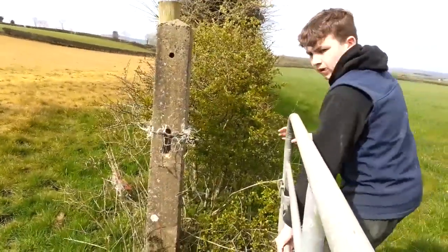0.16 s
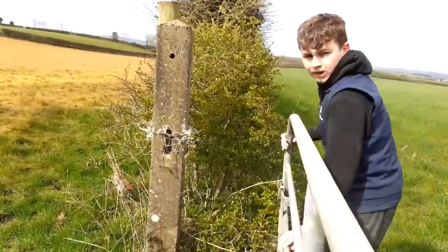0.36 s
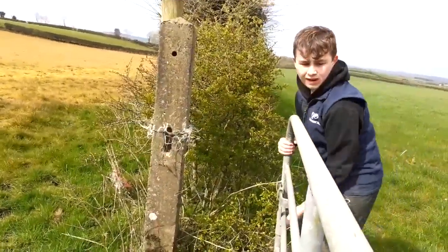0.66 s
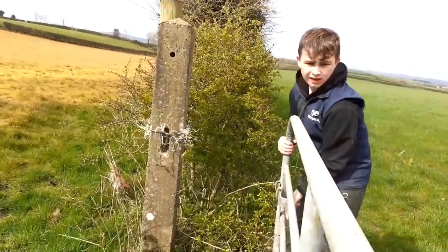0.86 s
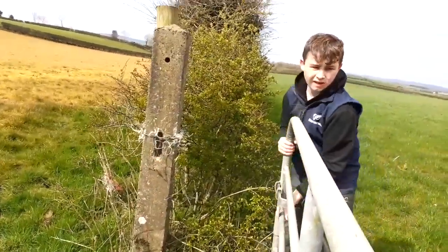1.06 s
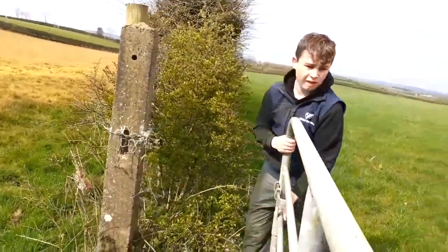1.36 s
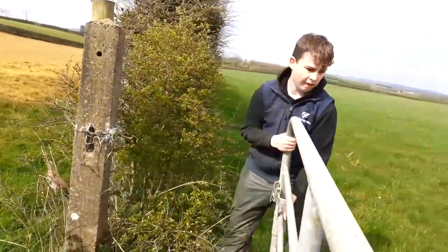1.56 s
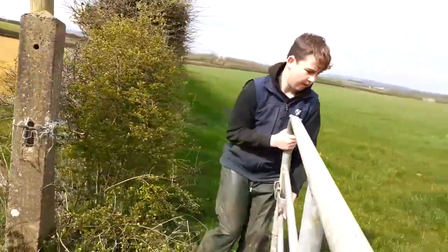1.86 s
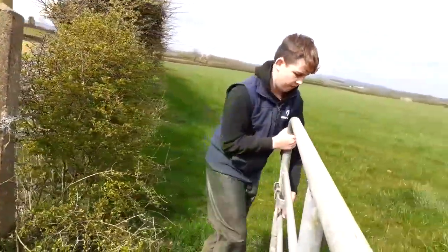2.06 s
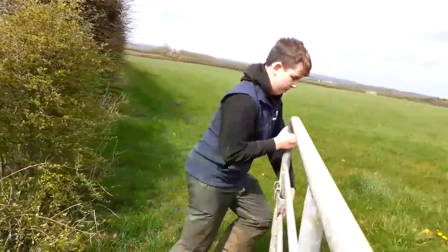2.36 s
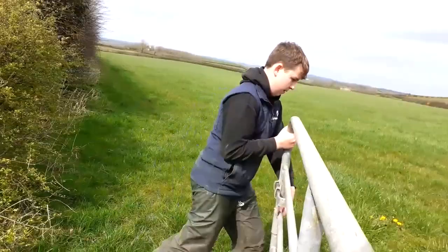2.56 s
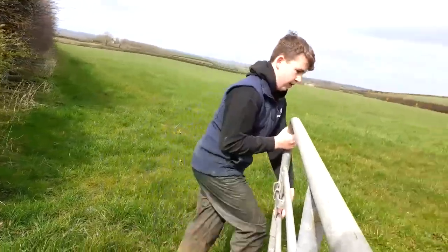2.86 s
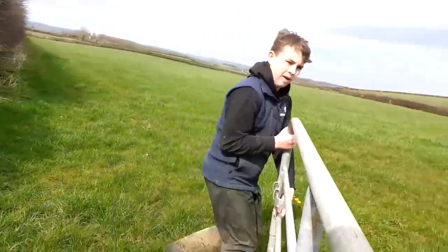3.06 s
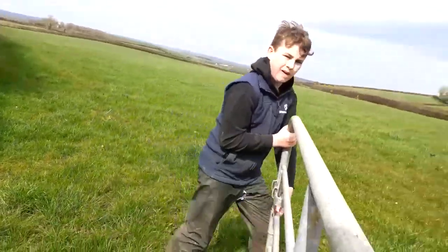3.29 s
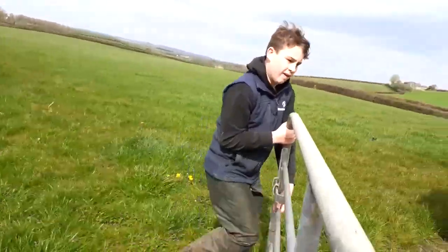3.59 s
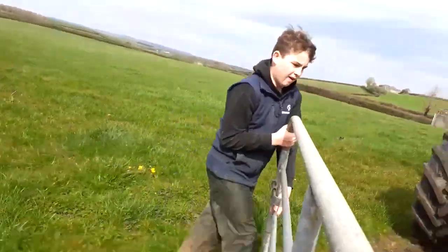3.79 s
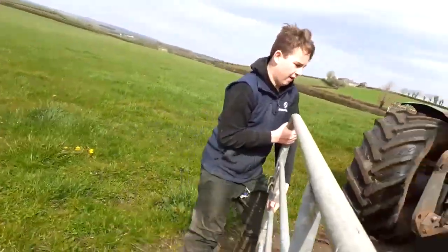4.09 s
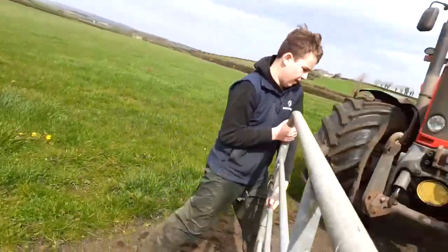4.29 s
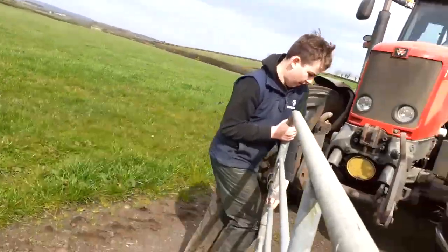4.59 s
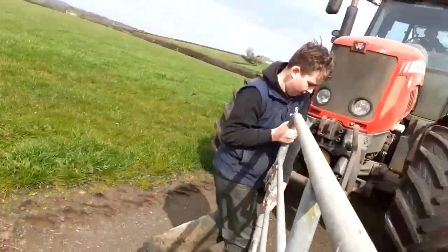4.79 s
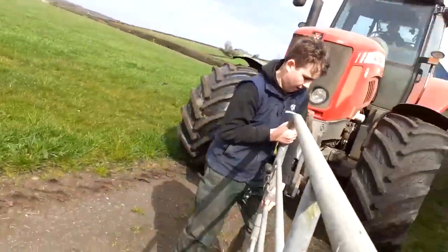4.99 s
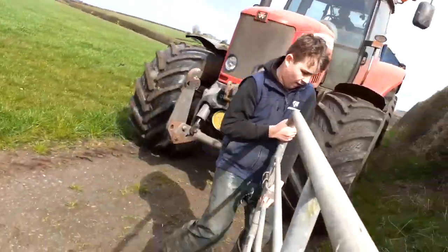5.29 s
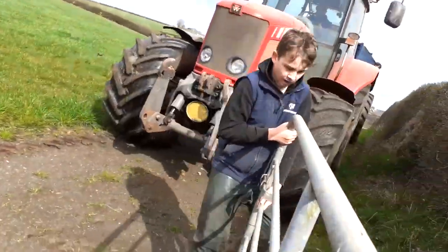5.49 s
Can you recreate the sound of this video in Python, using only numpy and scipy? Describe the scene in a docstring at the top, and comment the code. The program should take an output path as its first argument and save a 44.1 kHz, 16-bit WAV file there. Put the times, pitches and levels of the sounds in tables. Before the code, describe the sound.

Sharp ringing clanks of a steel gate over a steady clattering tractor idle, soon overwhelmed by thudding, rumbling wind buffets.

```python
"""A six-cylinder diesel tractor idles in an open field: hum, clatter and ticks, all timed by one crankshaft angle.
At once the chain and latch knock on a hollow tubular steel gate (decaying modes), which is then swung open.
Short metallic clinks and ticks, some of them single sharp engine knocks, are noise with a beating pair of tones.
The microphone rides round with the gate and turns towards the tractor; the lag between its ports follows.
Wind, as noise in random bursts, buffets first the right port, then both, in separate slaps over a rumble."""
import sys
import numpy as np
from scipy import signal
from scipy.fft import rfft, irfft, next_fast_len
from scipy.io import wavfile
from scipy.ndimage import map_coordinates

SR = 44100
rng = np.random.default_rng(int(sys.argv[2]) if len(sys.argv) > 2 else 0)


def put_to_file(sound):
    """Save the sound as 16-bit audio at rate SR, in the file named by the first command-line argument."""
    columns = np.atleast_2d(sound).T  # one column per channel
    safe = np.clip(columns, -1, 1)
    whole_steps = np.round(safe * 32767)
    wavfile.write(sys.argv[1], SR, whole_steps.astype(np.int16))


N = 249165
TIME = np.arange(N) / SR


def undb(db):
    """Amplitude ratio of a level: 20 dB for each factor of ten."""
    return 10 ** (np.asarray(db) / 20)


def unit(x):
    """Normalisation to an rms amplitude of 1."""
    return x / np.sqrt(np.mean(x ** 2))


def curves(table):
    """Linear interpolation in time of each column of a table."""
    s, *columns = np.transpose(table)
    return [np.interp(TIME, s, column) for column in columns]


def colour(x, points):
    """Minimum-phase filtering: the (f/Hz, level/dB) outline fixes the phase through a folded cepstrum."""
    hz, db = np.transpose(points)
    size = next_fast_len(x.shape[-1] + 4096) * 2
    f = np.maximum(np.fft.rfftfreq(size, 1 / SR), 1)
    outline_db = np.interp(np.log(f), np.log(hz), db)
    cepstrum = irfft(np.log(undb(outline_db)))
    # fold the anticausal half forwards
    cepstrum[1:size // 2] *= 2
    cepstrum[size // 2 + 1:] = 0
    response = np.exp(rfft(cepstrum))
    return irfft(rfft(x, size) * response)[..., :x.shape[-1]]


def walk(rate):
    """Band-limited random fluctuation: rms 1, changing about rate times a second."""
    grid = rng.standard_normal(8192)
    return unit(map_coordinates(grid, [TIME * rate], order=2, mode="wrap"))


def field_noise(alike_hz):
    """Spatial coherence: noise at two ports, alike in the bass and unrelated well above alike_hz."""
    likeness = 1 / (1 + np.fft.rfftfreq(2 * N, 1 / SR) / alike_hz)
    shared, *own = rfft(rng.standard_normal((3, 2 * N)))
    spectra = shared * np.sqrt(likeness) + np.array(own) * np.sqrt(1 - likeness)
    return irfft(spectra)[:, :N]


def sides(pan_db):
    """Interaural level difference: left and right gains, pan_db apart."""
    return undb(np.array([[pan_db], [-pan_db]]) / 2)


def windward(pan_db):
    """Sheltering: left and right gains, 1 at the port that takes the blow."""
    return sides(pan_db) / sides(pan_db).max()


def fade(t, t60):
    """Exponential decay of a free vibration, 60 dB in t60 seconds."""
    return np.exp(-np.log(1000) * t / t60)


def add(out, s, sound):
    """Linear superposition of a sound that starts at time s."""
    start = max(int(s * SR), 0)
    out[..., start:start + sound.shape[-1]] += sound[..., :N - start]


# Crankshaft speed: t/s, firing rate f/Hz
CRANK_SPEED = [(0, 42.44), (3.8, 42.44), (4.25, 41.8), (4.62, 39.2), (5.1, 40), (5.45, 41), (5.65, 41)]


def crank():
    """Phase as the integral of frequency: running count of firings."""
    return np.cumsum(curves(CRANK_SPEED)[0]) / SR - .07


# Knock of each cylinder in firing order: level/dB
CYLINDER_KNOCKS = [0, -2, 1, -38, -3.5, -17]


def knocks(firings, t60, steady, scatter_db):
    """Energy addition: decaying knocks, one a firing and each cylinder its own strength, over a steady rush."""
    count = np.floor(firings).astype(int)
    at = np.flatnonzero(np.diff(count)) + 1
    cylinder_db = np.array(CYLINDER_KNOCKS)[count[at] % len(CYLINDER_KNOCKS)]
    power = np.zeros(N)
    power[at] = undb(cylinder_db + scatter_db * rng.standard_normal(len(at))) ** 2
    t = TIME[:SR // 4]
    tail = (fade(t, t60) * (1 - np.exp(-t / 0.002))) ** 2
    return unit(np.sqrt(np.abs(signal.fftconvolve(power, tail)[:N]) + steady ** 2))


def engine_noise(firings, alike_hz, repeat):
    """Cyclostationary noise: a share of its power recurs with every two turns of the crankshaft."""
    cycle = firings / len(CYLINDER_KNOCKS) % 1
    place = (cycle * len(CYLINDER_KNOCKS) * SR / CRANK_SPEED[0][1]).astype(int)
    noise = field_noise(alike_hz)
    # the recurring share is read from the end of the noise, by crank angle
    recurring = noise[:, -1 - place]
    return np.sqrt(1 - repeat) * noise + np.sqrt(repeat) * recurring


# View of the tractor: t/s, lag of the left port/ms, how far the knocks stand out level/dB
BEARING_VIEW = [(0, 0.48, 0), (2, 0.47, -0.5), (3, 0.43, 2), (3.75, 0.29, 3), (4.25, 0.23, 3.5),
                (4.75, 0.11, 3.5), (5.3, -0.14, 5)]


def from_tractor(sound):
    """Interaural time difference: sound reaches the left port late or early, by the tractor's bearing."""
    lag_ms = curves(BEARING_VIEW)[0]
    left = np.interp(TIME - lag_ms / 1000, TIME, sound[0])
    return np.array([left, sound[1]])


# Reference level of the engine sound, dipping for a while after the strongest gusts: t/s, level/dB
ENGINE_LEVEL = [(0.0, -41.5), (0.35, -43), (2.17, -43), (2.45, -45), (2.51, -50), (2.72, -48), (2.81, -52),
                (3.0, -48.5), (3.2, -46.5), (3.55, -47.5), (3.85, -46), (4.47, -43), (5.24, -48),
                (5.65, -47)]
# Exhaust partials: multiple of the firing rate, mean level/dB within the hum
EXHAUST_PARTIALS = [(1, -14), (2, -1), (3, -5), (4, -19), (4.5, -15), (5, -15), (7, -11), (7.167, -4.5),
                    (7.333, -6), (7.5, -1), (7.667, -6), (8, -9), (8.5, -10)]
# Spectral outlines of the throbbing drone, block clatter and injector ticks: f/Hz, level/dB
DRONE_OUTLINE = [(25, -58), (50, -8.5), (75, -7), (110, 0.5), (170, -9.5), (245, -7), (285, 2), (314, -6),
                 (332, 3), (355, 0), (380, -5.5), (440, -1.5), (560, -6.5), (690, -5.5), (950, -18),
                 (2000, -55.5)]
BLOCK_OUTLINE = [(400, -6.5), (850, 1.5), (1100, 1), (1400, -1), (1650, 0.5), (2050, -0.5), (2400, -4.5),
                 (2750, -3), (3200, -10.5), (4500, -14.5), (8000, -29.5)]
INJECTOR_OUTLINE = [(1500, -52), (3000, 7.5), (4000, 5.5), (5000, 6), (6400, 4), (7800, 4.5), (8600, -5),
                    (9600, -37), (11500, -7), (16000, -7)]
# Parts relative to the reference level, dB; LOW_DB is for hum, fan and drone together, before shading
LOW_DB, BLOCK_DB, INJECTOR_DB = 18.5, 9.5, 1
BONNET_SHADE = 1  # the bonnet hides the exhaust: dB of low sound lost per dB that the knocks stand out


def tractor():
    """Harmonics and modulated noise: exhaust hum, fan tone, drone, clatter and ticks locked to the crank."""
    (engine_db,), (_, clear_db) = map(curves, (ENGINE_LEVEL, BEARING_VIEW))
    firings = crank()
    hum = 0
    for multiple, db in EXHAUST_PARTIALS:
        swell = undb(db + 2.6 * walk(9))
        hum = hum + swell * np.sin(2 * np.pi * (multiple * firings + rng.random()))
    fan = np.sin(2 * np.pi * 3.555 * firings)
    # seen head-on, the knocks stand further out of the steady rush
    rush = undb(-clear_db)
    drone = engine_noise(firings, alike_hz=8040, repeat=0.13)
    drone = drone * knocks(firings, t60=0.034, steady=0.55, scatter_db=5.5)
    block = engine_noise(firings, alike_hz=2900, repeat=.3)
    block = block * knocks(firings, t60=.09, steady=.6 * rush, scatter_db=1.2)
    injectors = engine_noise(firings, alike_hz=3000, repeat=.3)
    injectors = injectors * knocks(firings, t60=.06, steady=.36 * rush, scatter_db=1.5)
    low = undb(-2.5) * unit(hum) + undb(-17) * fan + undb(-2.3) * unit(colour(drone, DRONE_OUTLINE))
    engine = (low * undb(LOW_DB - BONNET_SHADE * clear_db)
              + unit(colour(block, BLOCK_OUTLINE)) * undb(BLOCK_DB)
              + unit(colour(injectors, INJECTOR_OUTLINE)) * undb(INJECTOR_DB))
    return from_tractor(undb(engine_db) * engine) * sides(pan_db=-1.5)


# Course of the high hiss before its swell: t/s, level/dB
HISS_LEVEL = [(0, -53), (1.5, -58), (2.15, -47.5), (2.45, -53.5), (2.6, -53), (2.92, -57.5), (3.6, -58),
              (4.35, -54), (5.25, -57), (5.65, -64)]
# Spectral outline of the hiss: f/Hz, level/dB
HISS_OUTLINE = [(2000, -35), (5000, 4), (7800, 7), (9600, -3.5), (11500, 4), (16000, 0)]
THROB_DB, THROB_AT = 3, 0.25  # swell either way; its place in the engine cycle (0-1)


def hiss():
    """Amplitude modulation: faint engine noise swells once a cycle, incoherent between the ports."""
    throb_db = THROB_DB * np.cos(2 * np.pi * (crank() / len(CYLINDER_KNOCKS) - THROB_AT))
    noise = unit(colour(rng.standard_normal((2, N)), HISS_OUTLINE))
    return noise * undb(curves(HISS_LEVEL)[0] + throb_db + 0.81 * walk(22.6))


# Steady breeze, growing as the gate swings into the open: t/s, level/dB midway between the ports
BREEZE_LEVEL = [(0, -47), (3, -32.5), (3.75, -29), (4.3, -22.5), (5.65, -19.5)]
# Gusts: start t/s, hold/s, level/dB at the stronger port, left minus right level/dB,
# rumble over flutter level/dB
GUST_EVENTS = [(0.602, 0.0099, -21, 7, -18), (1.932, 0.4, -27, -5.5, 3.5), (2.275, 0.092, -32.5, -15, 14),
               (2.45, 0.095, -25, -14, 8), (2.56, 0.034, -25.5, 1, 6), (2.592, 0.13, -22.5, -18, 7),
               (2.714, 0.089, -20, -20, 6), (4, 0.3, -28, 18, 4.5), (4.364, 0.12, -24, 3, 2),
               (4.512, 0.12, -22, 0.5, 2), (4.896, 0.066, -18, 2, 1), (4.996, 0.097, -18, -3, 0),
               (5.182, 0.084, -17.5, -0.5, -3), (5.349, 0.092, -18.5, 4, 3.5), (5.58, 0.08, -17.5, 3, -19)]
BREEZE_PAN_DB, BREEZE_RUMBLE_DB = 2.5, -5.5  # left minus right; rumble over flutter
GUST_ATTACK_S, GUST_RELEASE_S = .012, .026


def airflow():
    """Power addition of breeze and gusts that rise, hold and drop: flutter and rumble gains at each port."""
    flutter = (undb(curves(BREEZE_LEVEL)[0]) * sides(BREEZE_PAN_DB)) ** 2
    rumble = flutter * undb(BREEZE_RUMBLE_DB) ** 2
    for s, hold_s, db, pan_db, rumble_db in GUST_EVENTS:
        corners = [-GUST_ATTACK_S, 0, hold_s, hold_s + GUST_RELEASE_S]
        shape = np.interp(TIME - s, corners, [0, 1, 1, 0])
        power = (shape * undb(db) * windward(pan_db)) ** 2
        flutter = flutter + power
        rumble = rumble + power * undb(rumble_db) ** 2
    return np.sqrt(flutter), np.sqrt(rumble)


# Spectral outlines of flutter, rumble and rasp: f/Hz, level/dB
FLUTTER_OUTLINE = [(20, -17), (80, -26.5), (170, -2.5), (270, -3.5), (330, 5.5), (390, -2), (600, -9),
                   (900, -25), (1400, -44), (2000, -32), (3500, -44.5), (9000, -79)]
RUMBLE_OUTLINE = [(20, -32), (45, -9.5), (80, 0), (120, 4), (180, -9), (300, -2.5), (800, -69.5)]
RASP_OUTLINE = [(300, -10.5), (600, 22.5), (1000, 7), (1450, -18), (2000, 2), (2600, -36), (8000, -14),
                (12000, -70)]


def wind(flutters, rumbles):
    """Intermittent turbulence at each port: large eddies rumble, small ones flutter and rasp in bursts."""
    ports = []
    for flutter_gain, rumble_gain in zip(flutters, rumbles):
        burst_db = 4.2 * walk(120) + 1.5 * walk(40)
        flutter = unit(colour(rng.standard_normal(N) * undb(burst_db), FLUTTER_OUTLINE))
        rumble = unit(colour(rng.standard_normal(N) * undb(burst_db), RUMBLE_OUTLINE))
        # the rasp bursts more sharply
        rasp = unit(colour(rng.standard_normal(N) * undb(1.5 * burst_db), RASP_OUTLINE))
        small = undb(-1.0) * flutter + undb(-19.5) * rasp
        ports.append(flutter_gain * small + rumble_gain * rumble)
    return np.array(ports)


POP_REACH_S = .03  # computed to this far either side of its centre


def pop(hz, cycles):
    """Pressure pulse of one eddy: a sine under a sech envelope, above half height for the given cycles."""
    t = TIME[:2 * int(POP_REACH_S * SR)] - POP_REACH_S
    return np.sin(2 * np.pi * hz * t) / np.cosh(2 * np.arccosh(2) * t * hz / cycles)


# Hardest eddies: centre t/s, level/dB at the stronger port, mean pitch f/Hz, left minus right level/dB,
# width/cycles, crack over slap level/dB
SLAPS = [(2.292, -3.5, 224, -6, 0.83, -23), (2.331, -8, 142, -13, 0.61, -28),
         (2.34, -4.5, 127, -22, 1.5, -28), (2.462, 1, 310, -23, 0.77, -21),
         (2.4838, -1, 295, -21, 0.87, -30), (2.4959, 0, 282, -25, 0.8, -36),
         (2.5328, 0.5, 300, -24, 1, -24), (2.5676, -2, 264, 16, 0.76, -25), (2.607, -6, 210, -11, .7, -26),
         (2.619, 2.5, 306, -20, 0.95, -22), (2.636, 0.5, 487, -20, 0.72, -19),
         (2.6411, 1.5, 295, -17, 2, -23), (2.6696, 0.5, 327, -19, .9, -9.5),
         (2.7247, -2.5, 211, -27, 1.4, -30), (2.7414, 0.5, 300, -29, 1.3, -25),
         (2.756, -3.5, 407, -23, 1.04, -18), (2.7772, 0, 248, -23, 0.62, -35),
         (2.7874, 0, 180, -19, 0.57, -38), (2.7981, -7, 210, -21, 0.52, -37),
         (2.8162, -6, 256, -9, 0.64, -34), (3.981, -7.5, 333, -3.5, 2.8, -21),
         (4.043, -6, 313, -5, 2.4, -22), (4.2559, -7.5, 398, -6, 0.99, -19),
         (4.3586, -3, 348, -0.5, 1, -18), (4.3864, -2.5, 290, 2, 1.4, -28), (4.4367, -5, 243, 4, 1, -29),
         (4.491, -3.5, 130, 2.5, 1.15, -20), (4.5327, -4, 252, -6, 0.84, -27),
         (4.5658, -3.5, 327, -2.5, 1.35, -28), (4.579, -9, 243, 4, .9, -29),
         (4.6187, -5.5, 234, 4, 0.61, -28), (4.7119, -9.5, 403, 3, 0.71, -16),
         (4.8382, -9, 338, -4, 2.3, -28), (4.8597, 0, 313, 0, 1, -11.5), (4.8789, -9, 284, 9, 0.8, -30),
         (4.8898, -11, 287, 6, 0.84, -27), (4.924, -9, 365, -0.5, 4.1, -25),
         (4.9532, -15, 259, -3, 1.7, -21), (4.9634, -7, 357, -3, 0.6, -15), (4.997, -8, 258, -1, 0.83, -18),
         (5.008, -6.5, 308, 1, 1.7, -20), (5.0135, -2, 428, -6, 0.95, -10), (5.0262, -3, 248, 8, 1, -32),
         (5.053, -4, 353, -4, 2, -10.5), (5.0609, -1.5, 313, -1, 0.91, -15), (5.0854, -12, 358, 1, 2.1, -9),
         (5.1631, -0.5, 380, -9, 2.1, -10), (5.2059, -10, 236, 5, 0.6, -7), (5.223, -6, 172, 7, 0.79, -25),
         (5.2373, -1.5, 380, -4, 1.1, -20), (5.2567, -6, 341, 0, 1.2, -24), (5.2648, 0, 332, -7, 0.99, -20),
         (5.271, -2, 330, 6, 1, -11.5), (5.2824, -5, 326, -1, 1.6, -29), (5.2911, -4, 259, 7, 1.1, -30),
         (5.3848, 1, 310, -5, 1.3, -12.5), (5.4121, -5, 205, 1, 0.45, -12),
         (5.4351, -10, 220.3, 6, 0.75, -30), (5.4895, -5, 350, 5, 1.15, -22),
         (5.5841, -5, 296.4, 15, 1.13, -15), (5.59, 1, 387, -15, 1.1, -11), (5.638, -3, 370, -8, 4, -13)]
# Spectral outline of the crack: f/Hz, level/dB
CRACK_OUTLINE = [(300, -11.5), (600, 8), (1200, -4.5), (1700, -16), (3500, -34), (9000, -46)]
SLAP_LAG_S, SLAP_OCTAVES = .0009, .15  # chance shift of moment and pitch at each port, either way
CRACK_LEAD_S, CRACK_T60_S = .0015, .022  # the crack starts just before the slap's centre
# lesser eddies at each port: rate, level over the flutter gain and its scatter, pitch and its scatter
EDDIES_PER_S, EDDY_DB, EDDY_SCATTER_DB, EDDY_HZ, EDDY_OCTAVES = 22, 6.5, 0.5, 315, 0.64


def buffets(flutters):
    """Discrete pressure pulses: hard slaps with a crack, and lesser eddies scaled by the wind of the moment."""
    out, t = np.zeros((2, N)), TIME[:SR // 10]
    for s, db, hz, pan_db, cycles, crack_db in SLAPS:
        # each port swings with its own pitch and moment
        for port, (gain,), (lag, detune) in zip(out, windward(pan_db), rng.uniform(-1.03, 1, (2, 2))):
            crack = unit(colour(rng.standard_normal(len(t)), CRACK_OUTLINE)) * fade(t, CRACK_T60_S)
            slap = pop(hz * 2 ** (SLAP_OCTAVES * detune), cycles)
            add(port, s - POP_REACH_S + SLAP_LAG_S * lag, undb(db) * gain * slap)
            add(port, s - CRACK_LEAD_S, undb(db + crack_db) * gain * crack)
    slots = int(EDDIES_PER_S * N / SR)
    for port, strength in zip(out, flutters):
        # one eddy in each equal slot of time, at a chance moment within it
        for slot, (when, size, pitch) in enumerate(rng.uniform(-0.989, 1, (slots, 3))):
            s = (slot + (when + 1) / 2) / EDDIES_PER_S
            gain = strength[int(s * SR)] * undb(EDDY_DB + EDDY_SCATTER_DB * size)
            eddy = pop(EDDY_HZ * 2 ** (EDDY_OCTAVES * pitch), cycles=1.0)
            add(port, s - POP_REACH_S, gain * eddy)
    return out


MODE_SPREAD = .4  # largest phase step of a mode at each port, cycles


def ringing(modes):
    """Modal superposition: half a second of decaying sines, each a little out of step at the two ports."""
    t = TIME[:SR // 2]
    total = 0
    for hz, db, t60 in modes:
        phase = rng.random() + MODE_SPREAD * rng.random((2, 1))
        total = total + undb(db) * fade(t, t60) * np.sin(2 * np.pi * (hz * t + phase))
    return total


# Chain and latch strike the gate: t/s, level/dB, left minus right level/dB,
# rattle time constant/s, treble over bass level/dB
GATE_STRIKES = [(0.0395, -20.5, -4, 0.0027, -6.5), (0.099, -25, -1, 0.006, -13),
                (0.231, -13.5, -2.5, 0.0081, -2.5), (0.247, -25, -3, 0.063, -19),
                (0.284, -28, -3, .008, -16), (0.476, -24.5, -1, 0.015, -11.5), (1.017, -25.5, 1, 0.019, -2),
                (1.277, -30, -2, .003, -16), (3.214, -34.5, -3, .003, -14), (3.771, -30.5, -3, 0.003, -8),
                (5.511, -36, 0, .003, -19)]
# Main modes of the bars: f/Hz, level/dB, t60/s
BAR_MODES = [(899, -13, .3), (1010, -13, .3), (1141, -12, .3), (1330, -9, .28), (1400, -13, .45),
             (1476, -13, .35), (1674, -8, .3), (1697, -7, .35), (1777, -7, .25), (1898, -10, .25),
             (1957, -7, .25), (1993, -5, .28), (2081, -5, .2), (2114, -5, .2), (2164, 0, .25),
             (2353, -12, .4), (2654, -9, .4), (2772, -11, .35), (2888, -11, .3), (3060, -8, .2),
             (3267, -6, .28), (3366, -4, .2), (3482, 0, .24), (3546, -2, .22), (3893, -9, .25),
             (4005, -10, .25), (4790, -10, .18), (4910, -10, .18), (6077, -10, .2), (7030, -7, .15),
             (7170, -7, .15)]
# Spectral outlines of the crack and of the weaker tube modes: f/Hz, level/dB
STRIKE_OUTLINE = [(300, -43), (900, -7.5), (1800, 12), (3500, -4), (5000, 5.5), (6550, -14), (7150, 10),
                  (8500, -24), (10000, -8.5), (16000, -40)]
WEAK_OUTLINE = [(750, -6), (1400, -5), (2400, -3), (3200, 3), (4500, -4), (6200, -8), (7100, -7.5),
                (8400, -15.5)]
BARS_DB, STRIKE_CRACK_DB, STRIKE_T60_S = -14, -9.5, .12
WEAK_LOW_HZ, WEAK_HIGH_HZ, WEAK_MODE_COUNT = 750, 8400, 210
# weaker modes: level, t60 at 2 kHz, power of pitch by which it shortens
WEAK_DB, WEAK_T60_S, WEAK_DAMPING = -25.5, 0.39, 0.69


def gate():
    """Impact excitation of hollow bars: a rattle of contacts convolved with a crack and many ringing modes."""
    out, t = np.zeros((2, N)), TIME[:SR // 2]
    weak_hz = np.linspace(WEAK_LOW_HZ, WEAK_HIGH_HZ, WEAK_MODE_COUNT)
    weak_hz = weak_hz * (1 + .004 * rng.standard_normal(WEAK_MODE_COUNT))
    weak_modes = [(hz, 3 * rng.standard_normal(), WEAK_T60_S * (2000 / hz) ** WEAK_DAMPING) for hz in weak_hz]
    weak = ringing(weak_modes)
    bars = undb(BARS_DB) * ringing(BAR_MODES) + undb(WEAK_DB) * colour(weak, WEAK_OUTLINE)
    for s, db, pan_db, rattle_s, bright_db in GATE_STRIKES:
        # a first full contact, then sparse weaker ones, about 400 a second
        touches = rng.standard_normal(len(t)) * (rng.random(len(t)) < 400 / SR)
        contacts = touches * np.exp(-t / rattle_s) * .25
        contacts[0] = 1
        contacts /= np.linalg.norm(contacts)
        crack = unit(colour(rng.standard_normal((2, len(t))), STRIKE_OUTLINE)) * fade(t, STRIKE_T60_S)
        struck = undb(STRIKE_CRACK_DB) * crack + bars
        blow = signal.fftconvolve(struck, contacts[None])[:, :len(t)]
        blow = colour(blow, [(1700, -bright_db / 2), (4000, bright_db / 2)])
        add(out, s, blow * undb(db) * sides(pan_db))
    return out


# Knocks on the bolt: t/s, level/dB
LATCH_KNOCKS = [(.0395, -35), (.229, -17), (1.2785, -26.5)]
# Modes of the bolt: f/Hz, level/dB, t60/s
BOLT_MODES = [(1696, -4, .09), (1925, -8, .12), (1993, -7, .17), (2162, 0, .12), (3483, -15, .2),
              (3547, -15, .15)]


def latch():
    """Damped modes of a solid bolt: a few strong partials that die quickly."""
    out = np.zeros((2, N))
    for s, db in LATCH_KNOCKS:
        add(out, s, undb(db) * ringing(BOLT_MODES))
    return out * sides(pan_db=-3)


# Short metallic clinks and ticks, some of them single sharp engine knocks:
# t/s, level/dB, ring f/Hz, ring level/dB, t60/s, left minus right level/dB, top treble level/dB
METAL_TICKS = [(0.099, -37, 2800, 4, 0.12, -3, -6), (0.228, -28.5, 7040, -7, 0.2, 2, 8.5),
               (.521, -36.5, 5770, -9, .06, -10, -13), (1.021, -43, 6040, 5, 0.22, -7, 0),
               (1.036, -40, 3780, -5, 0.1, -2, -6), (1.181, -44, 6900, -6, .05, -5, -4),
               (1.276, -38, 6370, -3, .07, -3, -4), (2.17, -36, 7660, -1.5, 0.072, -15, -7),
               (2.31, -35.5, 4920, -9, 0.034, -15, -6), (2.596, -39.5, 6240, -5, 0.052, -8, 2),
               (3.364, -34, 7800, -8, 0.091, 2, 12), (4.343, -32, 4460, -4, 0.033, 2, -3),
               (4.367, -38, 7900, -0.5, 0.045, 0, 4), (4.392, -36, 4530, -18, .054, 6, 0),
               (4.592, -34.5, 5310, -7, 0.086, 3, -4), (4.8, -36, 4900, -15, .04, 2, -3),
               (5.416, -40, 3270, 1, 0.027, -2, -3), (5.637, -40.5, 4700, -1, .06, 4, -1)]
# Spectral outline of the noise in each: f/Hz, level/dB
TICK_OUTLINE = [(1500, -1), (4000, 4), (6800, 9.5), (8300, 0), (9500, -8), (13000, -13), (16000, -23)]


def clinks_and_ticks():
    """Beating of near-equal tones: each brief burst of noise rings with a tone and a weaker twin 23 Hz above."""
    out, t = np.zeros((2, N)), TIME[:SR // 2]
    for s, db, hz, ring_db, t60, pan_db, top_db in METAL_TICKS:
        burst = unit(colour(rng.standard_normal((2, len(t))), TICK_OUTLINE))
        burst = colour(burst, [(8000, 0), (11000, top_db)])
        twin = np.sin(2 * np.pi * ((hz + 23) * t + rng.random((2, 1))))
        ring = 1.33 * np.sin(2 * np.pi * hz * t) + .5 * twin
        add(out, s, undb(db) * (burst + undb(ring_db) * ring) * fade(t, t60) * sides(pan_db))
    return out


# Open front of the tractor: t/s, level/dB
GRILLE_LEVEL = [(3.7, -63), (4.1, -37.5), (4.4, -37), (5, -39.5)]
# Spectral outlines of the roar and of the rattling sheet: f/Hz, level/dB
ROAR_OUTLINE = [(400, -35.5), (700, 5), (1050, 3.5), (1420, 5), (1700, 0), (2000, -2), (2400, -35),
                (6000, -29.5)]
RATTLE_OUTLINE = [(900, -36), (1400, 1), (1650, -1), (1800, 6), (2020, -3), (2350, -23), (4000, -19),
                  (9000, -38)]
RATTLES_PER_S, RATTLE_DB = 260, -7  # mean rate of contacts; level against the steady roar


def grille():
    """Modulated noise and random impacts: fan roar and firing knocks, each rattling the thin front sheet."""
    beat = knocks(crank(), t60=.035, steady=.22, scatter_db=3)
    roar = unit(colour(field_noise(alike_hz=5000), ROAR_OUTLINE)) * beat * undb(2 * walk(150))
    contacts = rng.standard_normal(N) * (rng.random(N) < RATTLES_PER_S / SR) * beat
    rattle = unit(colour(contacts, RATTLE_OUTLINE)) * undb(RATTLE_DB)
    return from_tractor(roar + rattle) * undb(curves(GRILLE_LEVEL)[0])


def scene():
    """Free-field superposition: open ground, so no reverberation."""
    flutters, rumbles = airflow()
    engine = tractor() + grille() + hiss()
    metal = gate() + latch() + clinks_and_ticks()
    return engine + metal + wind(flutters, rumbles) + buffets(flutters)


# Treble difference of the ports: f/Hz, left minus right level/dB
PORT_DIFFERENCE = [(2000, 0.5), (4000, 0), (6000, -3), (8000, -0.5), (12000, 3)]
TOP_HZ = 15900  # upper edge of the pass band


def record(dry):
    """Frequency response, saturation and low-pass: ports differ, peaks round near full scale, the top is cut."""
    ports = []
    for x, side in zip(dry, (1, -1)):
        ports.append(colour(x, [(hz, side * db / 2) for hz, db in PORT_DIFFERENCE]))
    ports = np.array(ports)
    rounded = ports / (1 + ports ** 8) ** (1 / 8)
    low_pass = signal.ellip(10, .2, 80, TOP_HZ, fs=SR, output="sos")
    return signal.sosfilt(low_pass, rounded)


dry = scene()
out = record(dry)
put_to_file(out)
```